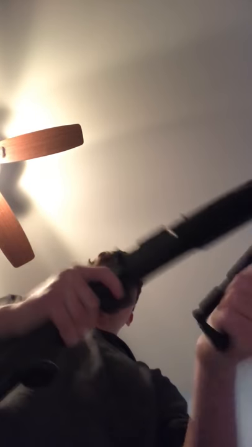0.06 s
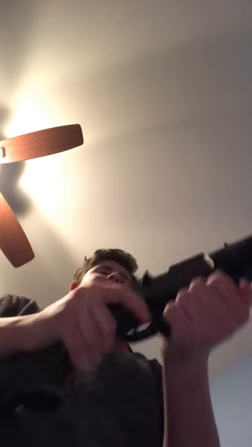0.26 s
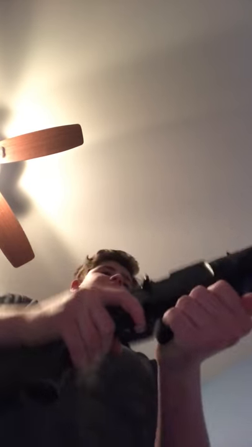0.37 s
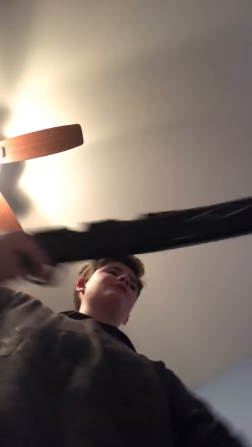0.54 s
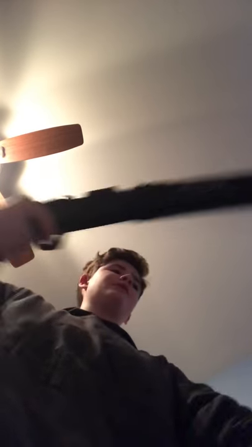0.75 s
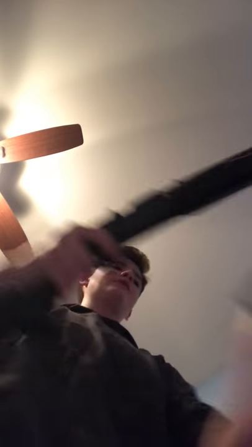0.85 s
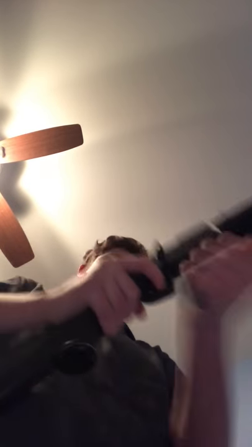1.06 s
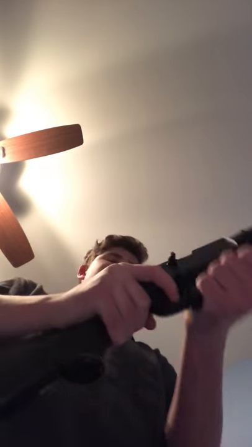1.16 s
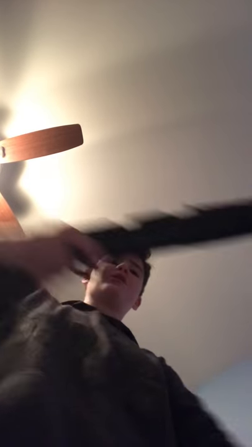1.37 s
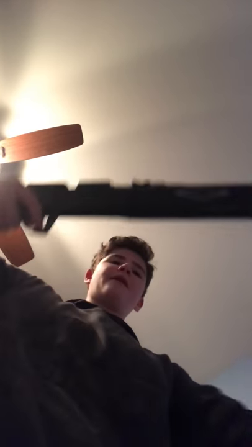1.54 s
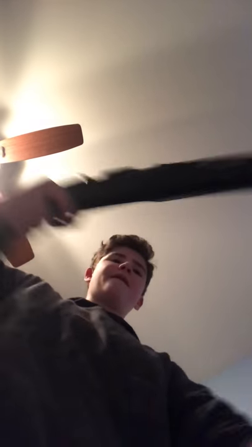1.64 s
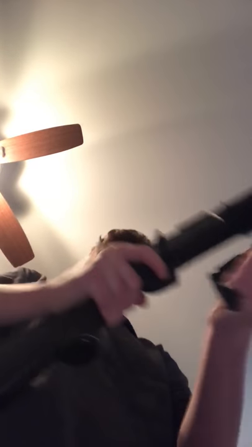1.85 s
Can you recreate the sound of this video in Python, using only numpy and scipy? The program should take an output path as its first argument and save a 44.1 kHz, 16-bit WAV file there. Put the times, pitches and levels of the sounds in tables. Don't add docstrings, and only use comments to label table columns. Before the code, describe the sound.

An air rifle's pump lever is worked an arm's length from a phone in a small room. Faint scraping and ticks lead to a tiny squeak and loud, hollow slam at 0.24 s. The latch clicks at 0.48, hinge at 0.54, stop knocks and rattles from 0.68. A second slam at 1.14, then clicks at 1.36 and 1.42, stop at 1.57, light ticks near 1.8. Faint hum.

```python
import sys
import numpy as np
from scipy import signal
from scipy.fft import rfft, irfft
from scipy.io import wavfile

SR = 44100
rng = np.random.default_rng(int(sys.argv[2]) if len(sys.argv) > 2 else 0)


def undo_db(level):
    steps = np.asarray(level, float) / 20
    return 10 ** steps


def wav_record(signal):
    frames = np.transpose(np.atleast_2d(signal))
    bounded = np.clip(frames, -1, 1)
    quanta = np.round(bounded * 32767).astype(np.int16)
    wavfile.write(sys.argv[1], SR, quanta)


N = 83790


def colour(x, points):
    hz, db = np.array(points, float).T
    grid_hz = np.arange(2049) * SR / 4096
    log_gain = np.interp(np.log(grid_hz + 1), np.log(hz), db) * np.log(10) / 20
    cepstrum = irfft(log_gain)
    folded = np.r_[cepstrum[0], 2 * cepstrum[1:2048], np.zeros(2048)]
    return signal.fftconvolve(x, irfft(np.exp(rfft(folded))))[:len(x)]


def unit(x):
    return x / np.sqrt(np.mean(x ** 2))


def band(x, hz, width):
    edges_hz = [hz / width, min(hz * width, .48 * SR)]
    return signal.sosfilt(signal.butter(4, edges_hz, "band", fs=SR, output="sos"), x)


def walk(rate_hz):
    return unit(band(rng.standard_normal(N), rate_hz, 1.76))


def decay(t, t60_s):
    return np.exp(-np.log(1000) * t / t60_s)


def add(out, at_s, sound):
    i = int(at_s * SR)
    out[i:i + len(sound)] += sound[:N - i]


# frequency in Hz, gain in dB.
HISS_COLOUR = [(30, -52), (68, -14.5), (140, 0.5), (240, 0.5), (450, -2.5), (1200, -23.5), (5000, -18.5),
               (16000, -27.5)]


def background(t):
    out = undo_db(-59.5 + walk(1.0)) * unit(colour(rng.standard_normal(N), HISS_COLOUR))
    out += undo_db(-62.5 + 1.3 * walk(8.7)) * np.sin(2 * np.pi * 120 * t)
    out += undo_db(-62.5 + 1.16 * walk(7.3)) * unit(band(rng.standard_normal(N), 61.6, 1.46))
    return out


# frequency in Hz, gain in dB.
SCRAPE_COLOUR = [(250, -18), (570, 4), (760, -11.5), (1030, 2.5), (1550, 2), (2300, -3.5), (4000, -14),
                 (12000, -27)]
# time in seconds, level in dB.
EFFORT = [(0, -59), (.04, -53.5), (.095, -50.5), (.125, -64.5), (.15, -55.5), (.19, -81), (.47, -50.5),
          (.64, -54.5), (.84, -61), (.9, -45), (.95, -57), (1.02, -63), (1.1, -76.5), (1.34, -51.5),
          (1.53, -59), (1.72, -58), (1.78, -48.5), (1.9, -66.5)]


def piston(t):
    grains_per_s, grain_db = 1500, 2.5
    draw = rng.random((3, N))
    slips = draw[0] < grains_per_s / SR
    grains = slips * undo_db(-grain_db * np.log(draw[1])) * np.sign(draw[2] - .5)
    level_db = np.interp(t, *np.array(EFFORT).T) + 2 + 1.2 * walk(17.0)
    return unit(colour(grains, SCRAPE_COLOUR)) * undo_db(level_db)


def part(contacts, modes, push_ms, feed_db, detune=0.016):
    spread_db, hand_damp_s, rings_on, swell_s, send_ring_s = 2.5, 0.0025, 0.45, 0.00085, 0.0079
    out, t = np.zeros((4, N)), np.arange(4096) / SR
    hz, db, t60_s = np.array(modes, float).T[:, :, None]
    small = hz[:, 0] > 950
    skirt = signal.butter(2, 850, "high", fs=SR, output="sos")
    grip = (rings_on + np.exp(-t / hand_damp_s)) * (1 - np.exp(-t / swell_s))
    for at_s, knock_db, tick_db, ms in contacts:
        chance = rng.standard_normal((3, len(modes), 1))
        noise = rng.standard_normal((2, 4096))
        level = undo_db(db + spread_db * chance[0]) * np.sign(chance[2])
        ring_hz = hz * (1 + detune * chance[1])
        rings = level * decay(t, t60_s) * np.sin(2 * np.pi * ring_hz * t) * grip
        ring = rings[~small].sum(axis=0) + signal.sosfilt(skirt, rings[small].sum(axis=0))

        push = t * np.exp(-1000 * t / push_ms) * (1 + .4 * noise[0])
        knock = signal.fftconvolve(ring, push)[:4096]
        knock = undo_db(knock_db) * knock / np.abs(knock).max()

        contact_ms = max(ms, .1)
        fade = np.exp(-2000 * t / contact_ms) + 0.23 * np.exp(-400 * t / contact_ms)
        grit = undo_db(tick_db) * (1 - np.exp(-t / 0.00027)) * fade * noise[1]

        add(out[0], at_s, knock)
        add(out[1], at_s, grit)
        add(out[2], at_s, unit(knock * decay(t, send_ring_s)) * np.std(knock))
        add(out[3], at_s, undo_db(feed_db) * np.array([np.sqrt(np.sum(grit ** 2))]))
    return out


# time in seconds, body knock in dB, bright tick in dB.
RATTLE = [(0.039, -42, -70), (.128, -42.5, -66), (.134, -40, -50), (0.2146, -39.5, -50.5),
          (0.225, -44.5, -58), (.231, -27.5, -50), (0.631, -48, -64), (0.848, -59, -61), (.899, -52, -54),
          (.908, -36, -59), (0.934, -47, -58.5), (.981, -46, -48.5), (1.121, -38.5, -52),
          (1.13, -32.5, -53), (1.747, -58, -57.5), (1.756, -48, -80), (1.774, -34.5, -60),
          (1.784, -36, -58), (1.819, -48, -54.5), (1.835, -43.5, -60), (1.874, -45, -47.5)]
# mode in Hz, level in dB, T60 in seconds.
RATTLE_MODES = [(568, -12, 0.04), (1038, -6, 0.04), (1250, -8, 0.0253), (1456, -4, 0.04),
                (1940, -2.5, 0.03), (2800, -9, 0.03)]


def rattle():
    contact_ms = 5.8
    contacts = [tuple(row) + (contact_ms,) for row in RATTLE]
    return part(contacts, RATTLE_MODES, 0.027, feed_db=3.5, detune=0.044)


# time in seconds, level in dB, frequency in Hz, T60 in seconds.
STOCK = [(.686, -33, 530, .06), (.2366, -5, 4230, .012), (.752, -45, 345, .18), (.888, -50, 600, .1),
         (.904, -45, 565, .17), (.905, -40, 1010, .2), (.904, -46, 280, .06), (.893, -48, 1460, .1),
         (.872, -50, 1110, .1), (1.762, -48, 495, .1), (1.779, -43, 520, .05), (1.42, -46, 540, .06),
         (1.354, -44, 180, .05), (.13, -50, 200, .05), (1.569, -22, 1345, .04), (.476, -44, 180, .05),
         (1.775, -46, 300, .06), (1.835, -41, 1060, .06)]


def stock(t):
    out, u = np.zeros(N), t[:SR // 4]
    swell = 1 - np.exp(-u / 0.0015)
    for at_s, db, hz, t60_s in STOCK:
        add(out, at_s, undo_db(db - 0.5) * swell * decay(u, t60_s) * np.sin(2 * np.pi * hz * u))
    return out


# time in seconds, level in dB, frequency in Hz, T60 in seconds.
BUMPS = [
    (0.145, -38.5, 70.4, 0.16),
    (0.241, -37, 66, 0.13),
    (0.97, -54, 55.3, 0.28),
    (1.147, -41.5, 56, 0.37),
    (1.874, -37.5, 128, 0.045),
]


def bumps(t):
    out = np.zeros(N)
    for at_s, db, hz, t60_s in BUMPS:
        add(out, at_s, undo_db(db) * decay(t, t60_s) * np.sin(2 * np.pi * hz * t))
    return out


# start in seconds, end in seconds, frequency in Hz, level in dB.
SQUEAK = [
    (.222, .236, 8100, -50),
    (1.122, 1.142, 8100, -46),
    (1.133, 1.142, 2650, -34),
]


def valve():
    out = np.zeros(N)
    for start_s, end_s, hz, db in SQUEAK:
        u = np.arange(int((end_s - start_s) * SR)) / SR
        wobble_rad = .7 * walk(130)[:len(u)]
        add(out, start_s, undo_db(db) * np.sqrt(u / (end_s - start_s)) * np.sin(2 * np.pi * hz * u + wobble_rad))
    return out


# time in seconds, body knock in dB, bright tick in dB, contact length in ms.
SLAM_FIRST = [(.2354, -44.5, -31, 1.5), (.2371, -21.5, -5, 1.3), (.2378, -18.5, -8, 1.35),
              (.2394, -8, -10.5, 1.2), (.2411, -7.5, -22, 3), (.2428, 0.5, -20, 4), (.2447, -5.5, -21.5, 3),
              (.2468, -18.5, -21, 4), (.2515, -20, -25, 6), (.2565, -22, -28, 6), (.2625, -16.5, -24, 6)]
SLAM_SECOND = [(1.1413, -16.5, -20.5, 1.8), (1.1435, -3, -7.5, 1.78), (1.1450, -4, -11.5, 2.04),
               (1.1471, -1.5, -22, 2.9), (1.1503, -16.5, -15, 1.8), (1.1535, -15, -17.5, 2),
               (1.156, -11, -23, 2.3), (1.1612, -31, -27.5, 5.4), (1.1675, -18, -22, 4),
               (1.1735, -16, -28, 7.3)]
# mode in Hz, level in dB, T60 in seconds.
FIRST_MODES = [(305, -5.5, 0.023), (391, -2.5, 0.018), (864, -5.5, 0.085), (848, -0.5, 0.034),
               (1150, -11.5, 0.029), (1444, 4, 0.05), (1675, -4.5, 0.03), (2058, 5.5, 0.03),
               (464, -17.5, 0.015), (2850, -15, 0.08), (2530, -3.5, 0.058), (4130, -2.5, 0.015)]
SECOND_MODES = [(290, -1, 0.017), (385, -3, 0.024), (910, -3, 0.036), (1005, -7, 0.012), (1123, -8.5, 0.1),
                (1413, 4, 0.077), (1650, 0, 0.063), (2054, 3.5, 0.025), (490, -3, 0.017),
                (2870, -2.5, 0.069), (2210, -3.5, 0.026), (640, -6, 0.026)]


def slam():
    first = part(SLAM_FIRST, FIRST_MODES, 0.033, feed_db=3.5, detune=0.0068)
    return first + part(SLAM_SECOND, SECOND_MODES, 0.028, feed_db=2.0, detune=0.0046)


# time in seconds, body knock in dB, bright tick in dB, contact length in ms.
LATCH = [
    (.4762, -12, -34.5, 5.6),
    (.4798, -28, -28, 3.7),
    (.491, -29, -47, 3.9),
    (1.353, -37, -36, 5.7),
    (1.3558, -11, -29, 3.4),
    (1.3585, -32, -27.5, 2.1),
    (1.367, -26, -39, 2.4),
]
# mode in Hz, level in dB, T60 in seconds.
LATCH_MODES = [(366, -14, 0.055), (1097, 1, 0.034), (1340, -2.5, 0.0092), (1533, 8, 0.014),
               (1725, -4, 0.034), (2146, -10, 0.047), (3880, -14, 0.045), (4800, -11, 0.015)]


def latch():
    return part(LATCH, LATCH_MODES, 0.034, feed_db=-0.5)


# time in seconds, body knock in dB, bright tick in dB, contact length in ms.
HINGE = [
    (.5275, -29, -34.5, 3.4),
    (.5372, -23.5, -29, 0.42),
    (.5387, -12, -24, 4),
    (.544, -29, -41, 0.92),
    (1.407, -24.5, -40, 3),
    (1.415, -27.5, -47, 3.4),
    (1.4184, -13, -27, 4.2),
    (1.423, -35, -50, 1.2),
]
# mode in Hz, level in dB, T60 in seconds.
HINGE_MODES = [(363, -27.5, 0.041), (1047, -11.5, 0.047), (1407, -5.5, 0.016), (1560, -40, 0.026),
               (2090, -6, 0.033), (2480, -1, 0.0086), (2720, -8, 0.028), (5560, -7, 0.036)]


def hinge():
    return part(HINGE, HINGE_MODES, 0.075, feed_db=-4.0)


# time in seconds, body knock in dB, bright tick in dB, contact length in ms.
STOP = [(.672, -44, -57, 12), (.6805, -27.5, -24, 2.4), (.6816, -15, -21.5, 1.4), (.6838, -10, -46, 1.1),
        (.6895, -20.5, -45, 2.5), (.697, -30, -47, 3), (.705, -31, -39, 3), (.719, -39, -42.5, 2.4),
        (.7225, -33, -41, 2), (.7445, -25, -33.5, 3.8), (.7465, -32.5, -40, 1.7), (.752, -24.5, -52, 1.8),
        (.7845, -30, -39.5, 0.88), (.7895, -33.5, -46, 2), (1.549, -57, -50.5, 14),
        (1.5675, -8.5, -19, 1.9), (1.571, -9.5, -34, 2.6), (1.599, -50, -42.5, 10), (1.608, -24, -42, 4.2),
        (1.639, -30, -47, 2), (1.670, -38, -49, 4.5), (1.677, -27, -44, 1.8)]
# mode in Hz, level in dB, T60 in seconds.
STOP_MODES = [(491, -22.5, 0.022), (1136, -16, 0.047), (1333, -2, 0.037), (1524, -6.5, 0.018),
              (1860, -3, 0.011), (2385, 7, 0.0073), (3350, -6, 0.02), (4340, 3.5, 0.01)]


def stop():
    return part(STOP, STOP_MODES, 0.081, feed_db=-1.5)


# frequency in Hz, gain in dB.
TICK_COLOUR = [(800, -28), (2500, 7.5), (4300, 11), (6500, 9.5), (9000, 4), (10500, -1), (12500, 3),
               (16000, -5)]


def lever():
    knocks, grit, knock_feed, grit_feed = slam() + latch() + hinge() + stop() + rattle()
    body_cut = signal.butter(4, 261, "high", fs=SR, output="sos")
    near = signal.sosfilt(body_cut, knocks + colour(grit, TICK_COLOUR))
    feed = signal.sosfilt(body_cut, knock_feed + colour(grit_feed, TICK_COLOUR))
    return near, feed


# band in Hz, T60 in seconds, level in dB.
ROOM = [(257, 0.41, -15), (626, 0.3, -10), (1124, 0.27, -6), (2160, 0.37, -10), (4370, 0.37, -8.5),
        (7800, 0.31, -12), (13700, 0.2, -11.5)]


def room(x):
    first_echo_s, build_s = 0.001, 0.012
    t = np.arange(SR // 2 + SR // 4) / SR
    tail = 0
    for hz, t60_s, db in ROOM:
        noise = unit(band(rng.standard_normal(len(t)), hz, np.sqrt(2) if hz < 6000 else 1.28))
        fade = decay(t, t60_s)
        tail = tail + undo_db(db) * noise * fade * np.sqrt(hz / SR * 0.98 / np.sum(fade ** 2))
    onset = np.clip((t - first_echo_s) / build_s, 0, 1)
    return signal.fftconvolve(x, tail * onset * undo_db(2.17 * walk(134.6)[:len(t)]))[:N]


def scene():
    t = np.arange(N) / SR
    near, feed = lever()
    slide = piston(t) + valve() + stock(t)
    mix = near + slide + room(feed + slide) + background(t) + bumps(t)
    return mix[None]


def low_pass(x):
    return signal.sosfilt(signal.butter(12, 16820, fs=SR, output="sos"), x)


def record(dry):
    top_hz = 15800
    step = signal.ellip(6, .2, 20, top_hz, fs=SR, output="sos")
    wall = signal.ellip(10, .2, 70, 1.055 * top_hz, fs=SR, output="sos")
    rounded = np.tanh(0.81 * dry) / 0.8
    return low_pass(signal.sosfilt(np.r_[step, wall], rounded))


dry = scene()
out = record(dry)
wav_record(out)
```